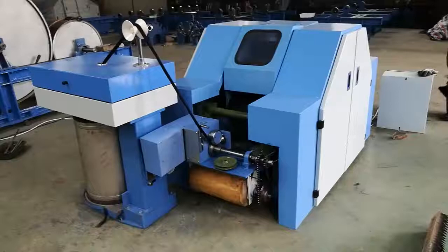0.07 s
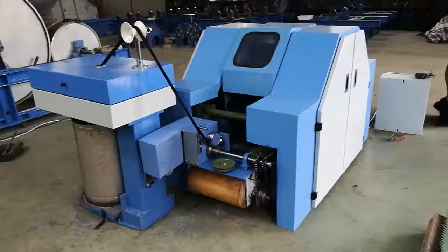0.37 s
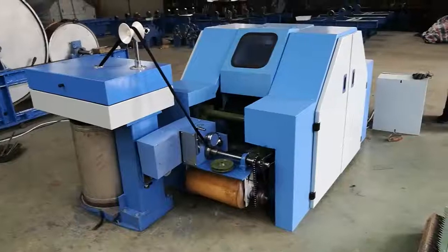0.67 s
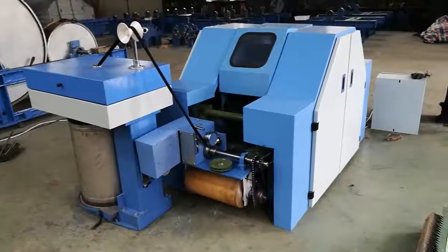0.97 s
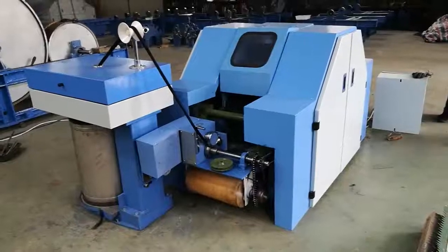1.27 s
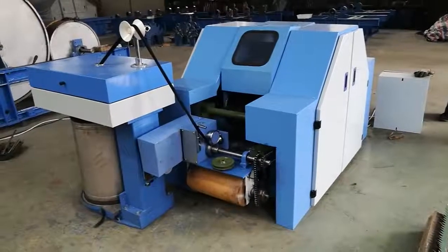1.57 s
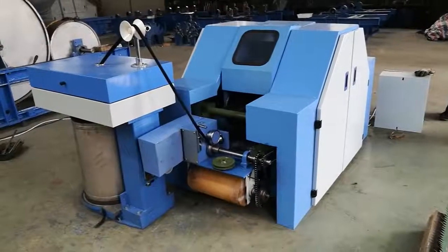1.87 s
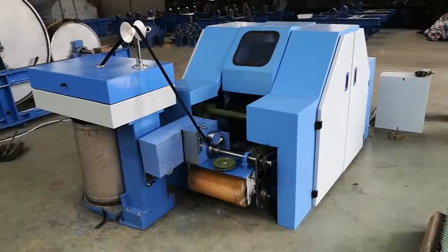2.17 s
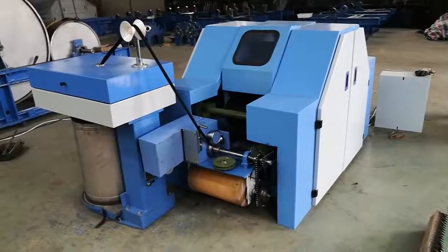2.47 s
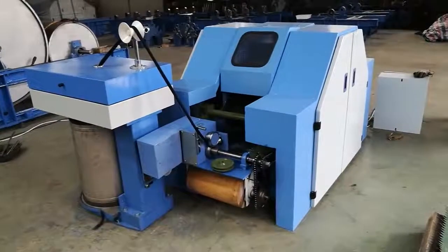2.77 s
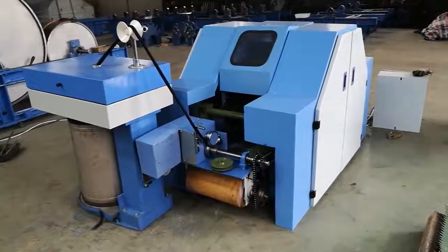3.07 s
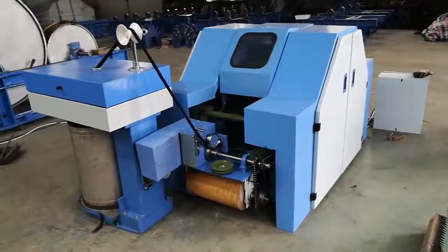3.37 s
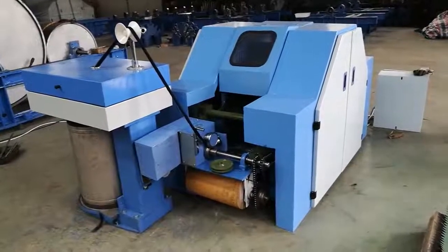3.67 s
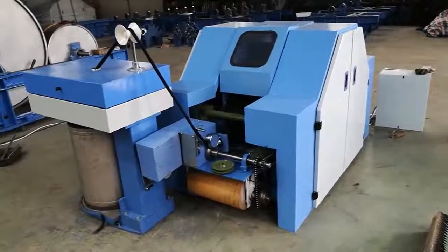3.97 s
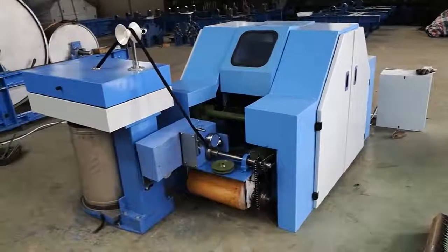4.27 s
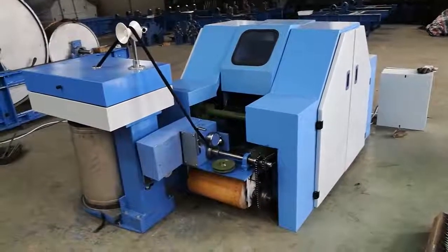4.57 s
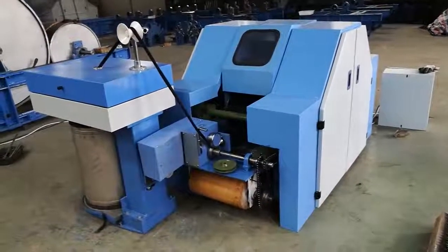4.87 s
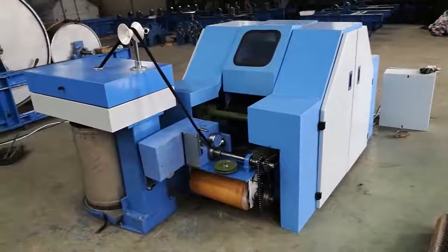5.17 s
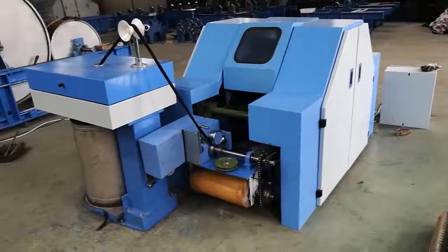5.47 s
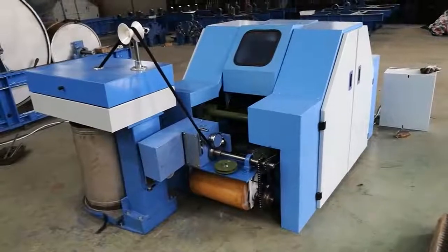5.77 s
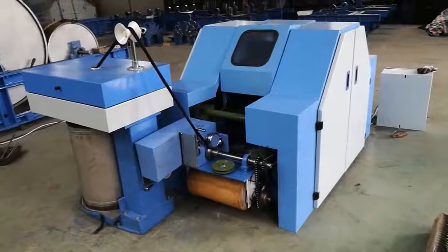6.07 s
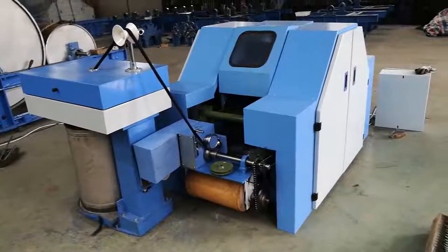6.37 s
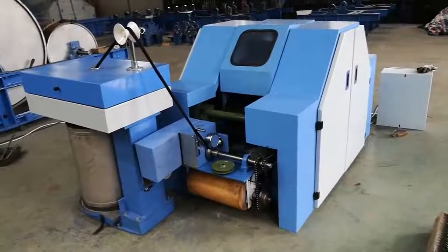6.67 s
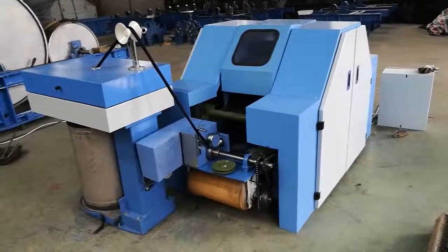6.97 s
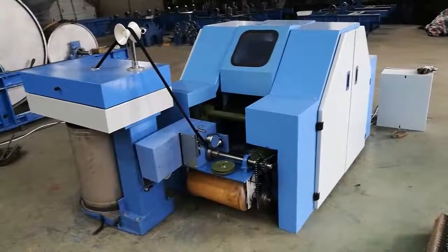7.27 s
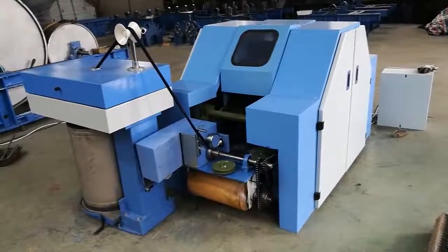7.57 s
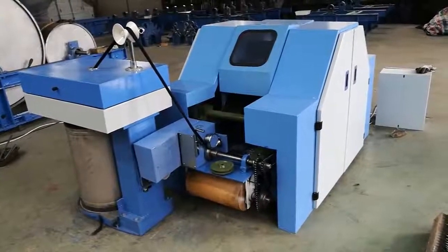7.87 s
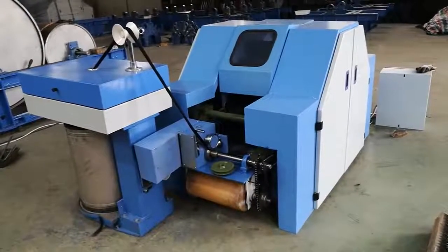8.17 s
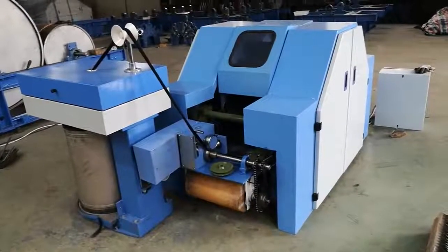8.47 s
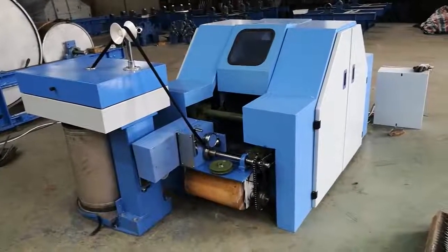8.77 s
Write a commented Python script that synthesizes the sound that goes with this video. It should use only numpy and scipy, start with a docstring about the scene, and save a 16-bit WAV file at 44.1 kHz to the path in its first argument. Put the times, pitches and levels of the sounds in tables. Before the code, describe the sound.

Steady mechanical drone, metallic rattle and hiss from a running carding machine, with scattered light knocks and one panel clunk.

```python
"""A steady drone, clatter and hiss: a wool carding machine in a concrete workshop, a few metres from
a phone's two microphones. A gear drones and its teeth ring the steel, a roller hums, the frame rumbles,
chains clatter, the card wire hisses and the motor drive whistles. Faint high rings swell and fade, a
loose part knocks, and once a side panel clunks. The left microphone faces away and sounds duller."""
import sys
import numpy as np
from scipy import signal
from scipy.fft import rfft, irfft, next_fast_len
from scipy.io import wavfile
from scipy.ndimage import uniform_filter1d

SR = 44100
rng = np.random.default_rng(int(sys.argv[2]) if len(sys.argv) > 2 else 0)


def generate_wav(signal):
    """Clip the signal to [-1, 1] and save it as 16-bit WAV at the path in sys.argv[1]."""
    frames = np.transpose(np.atleast_2d(signal))
    scaled = np.clip(frames, -1, 1) * 32767
    pcm = np.round(scaled).astype(np.int16)
    wavfile.write(sys.argv[1], SR, pcm)


N = 393813
TIME = np.arange(N) / SR
SIZE = next_fast_len(N + SR, True)
FREQ = np.maximum(np.fft.rfftfreq(SIZE, 1 / SR), 1)
MESH_HZ = 164.15  # gear teeth meeting per second


def undb(db):
    """Decibels to gain."""
    return 10 ** (np.asarray(db) / 20)


def unit(x):
    """Scale to rms 1."""
    return x / np.sqrt(np.mean(x ** 2))


def curve(points):
    """Join (t/s, value) points by straight lines."""
    times, values = np.transpose(points)
    return np.interp(TIME, times, values)


def walk(rate):
    """Random levels held 1 / rate s and smoothed twice, rms 1."""
    hold = max(int(SR / rate), 1)
    steps = np.repeat(rng.standard_normal(N // hold + 1), hold)[:N]
    return unit(uniform_filter1d(uniform_filter1d(steps, hold), hold))


def slope(points):
    """Gain at every frequency from (f/Hz, level/dB) points."""
    hz, db = np.transpose(points)
    return undb(np.interp(np.log(FREQ), np.log(hz), db))


def resonances(peaks):
    """Gain at every frequency of steep-sided (f/Hz, half-width/Hz, level/dB) resonances."""
    return np.sqrt(sum(undb(db) ** 2 / (1 + ((FREQ - hz) / width) ** 2) ** 2 for hz, width, db in peaks))


def ring(x, gain):
    """Pass x through the causal (minimum-phase) body that has this gain."""
    cepstrum = irfft(np.log(gain + 1e-6), SIZE)
    cepstrum[1:SIZE // 2] *= 2
    cepstrum[SIZE // 2 + 1:] = 0
    return irfft(rfft(x, SIZE) * np.exp(rfft(cepstrum)), SIZE)[:N]


def band(hz, half_width_hz):
    """Noise in one resonance, rms 1."""
    noise = rfft(rng.standard_normal(SIZE))
    return unit(irfft(noise * resonances([(hz, half_width_hz, 0)]), SIZE)[:N])


def impacts(rate, scatter_db):
    """Random tiny blows of uneven strength, rate a second."""
    blows = (rng.random(N) < rate / SR) * rng.choice([-1, 1], N)
    return unit(blows * undb(scatter_db * rng.standard_normal(N)))


def tone(phase, waver_db, waver_rate):
    """A sine of rms 1 whose strength wavers."""
    return unit(np.sin(phase + 2 * np.pi * rng.random()) * undb(waver_db * walk(waver_rate)))


def strike(start, decay_s, rise_s=0.001):
    """Envelope of a blow: a quick rise and an exponential fall."""
    age = np.maximum(TIME - start, 0)
    return (1 - np.exp(-age / rise_s)) * np.exp(-age / decay_s)


def modes(start, table):
    """Decaying sines (f/Hz, level/dB, decay/s) set off by one blow."""
    live = (TIME > start) & (TIME < start + 1)
    age = TIME[live] - start
    out = np.zeros(N)
    for hz, db, decay in table:
        out[live] += rng.choice([-1, 1]) * undb(db) * np.sin(2 * np.pi * hz * age) * np.exp(-age / decay)
    return out


def gear_drone(turn, drone_db):
    """The gear mesh drones at an uneven level, under two overtones; backlash makes it flutter."""
    # level of the drone's octave: t/s, level/dB
    octave = [(.4, -43), (1.2, -41), (2.2, -46.5), (3.4, -46), (4.3, -40), (5.4, -42), (5.9, -44),
              (6.45, -37.5), (6.8, -47), (7.3, -40), (7.9, -53), (8.9, -54)]
    mesh = MESH_HZ * turn + 0.13 * walk(25)
    first = tone(mesh, waver_db=0.7, waver_rate=12) * undb(drone_db + 1.6)
    second = tone(2 * mesh, waver_db=0.9, waver_rate=6.8) * undb(curve(octave))
    fourth = tone(4 * mesh, waver_db=2.5, waver_rate=7) * undb(-53)
    return first + second + fourth


def roller_hum(turn, roller_hz=11.905):
    """The roller and the other shafts shake the casing, each at its own rates."""
    # roller harmonics: multiple of the turning rate, relative level/dB
    roller = [(5, -68.9), (7, -62.2), (10, -60.5), (13, -56.5), (15, -51.5), (18, -56.5), (25, -53.7),
              (29, -51.2), (31, -50.1), (33, -50.7), (34, -55.8), (35, -46), (36, -50.5), (38, -51.7),
              (40, -53.8), (50, -52.0), (52, -54.5), (57, -55.9)]
    # hum of the other shafts: f/Hz, relative level/dB
    shafts = [(86.5, -61.9), (144.0, -54.1), (198.5, -54.5), (255.7, -55.4), (284.3, -53.9), (287.7, -54.8),
              (337.8, -51.1), (344.5, -49.5), (495.9, -54.7), (587.5, -50.8)]
    lines = [(k * roller_hz, db) for k, db in roller] + list(shafts)
    return undb(1) * sum(undb(db) * tone(hz * turn, waver_db=2.5, waver_rate=5) for hz, db in lines)


def frame_rumble(drone_db, ease_db_per_s=0.2, drone_share=0.078):
    """Drums and belts rumble through the frame, swaying a little with the drone and slowly easing."""
    # spectrum of the frame: f/Hz, relative level/dB
    spectrum = [(20, -32), (45, -26), (65, -19.5), (85, -12.5), (102, -17.5), (125, -13), (152, -5.5),
                (215, -6.5), (340, -1.5), (440, -6), (660, -7), (800, -18.5), (1500, -18), (5000, -63)]
    level_db = -32 - ease_db_per_s * TIME + drone_share * signal.detrend(drone_db)
    return unit(ring(rng.standard_normal(N), slope(spectrum))) * undb(level_db)


def chain_clatter(shake):
    """Links drop onto sprockets and rattle their guards."""
    # spectrum of the chains: f/Hz, relative level/dB
    spectrum = [(300, -19.5), (800, -8), (920, -5), (1650, -4), (1900, -1.5), (2250, 0), (2500, -4.5),
                (3000, -10.5), (3600, -17), (7000, -30.5)]
    # modes of the chain guards: f/Hz, half-width/Hz, relative level/dB
    guards = [(1004, 24, -0.5), (1872, 30, 2), (1985, 48, -1.5), (2616, 44, 0.5), (2750, 40, -20)]
    # brief changes in how hard the chains rattle: t/s, half-length/s, change/dB
    flurries = [(1.047, 0.045, -0.5), (1.68, 0.12, 0.8), (5.303, 0.1, 1.5), (5.547, 0.086, 1),
                (7.46, 0.077, 0.5)]
    links = impacts(rate=6000, scatter_db=1.14) * undb(0.29 * shake)
    flurry_db = sum(db * np.exp(-((TIME - at) / half) ** 2) for at, half, db in flurries)
    body = np.hypot(slope(spectrum), undb(-1.5) * resonances(guards))
    return unit(ring(links, body)) * undb(-28.5 + 0.22 * walk(7) + flurry_db)


def gear_teeth(turn, shake, ease_db_per_s=0.01, surge_half_s=0.022):
    """Every tooth scrapes in and out of mesh and rings the steel, whose upper modes swell and ebb."""
    # lower and upper modes of the steel gears: f/Hz, half-width/Hz, relative level/dB
    lower_modes = [(4437, 41, -16), (4635, 230, -12.8), (4852, 38, -5.5), (4934, 18, -.7), (4986, 42, -3.6),
                   (5074, 34, -3.2), (5142, 58, -4.2), (5262, 36, -7.2)]
    upper_modes = [(5425, 55, -5.5), (5498, 42, -1), (5543, 18, 2), (5670, 150, -11.5)]
    # the upper modes against the lower: t/s, level/dB
    upper_level = [(.4, -4), (2.2, -5), (2.8, -7.5), (3.7, -6.5), (4.2, -5.5), (5.0, -2.5), (7.2, -3),
                   (7.9, -2.5), (8.9, -3)]
    # the teeth bite harder for a moment: t/s, rise/dB
    surges = [(4.17, 5.5), (8.24, 3.5), (8.46, 3.5)]
    mesh = MESH_HZ * turn
    contact = 1 + 0.12 * np.cos(mesh) + 0.2 * np.cos(2 * mesh)
    scrape = impacts(rate=7000, scatter_db=3.0) * contact * undb(0.28 * shake)
    lower = unit(ring(scrape, resonances(lower_modes)))
    upper = unit(ring(scrape, resonances(upper_modes))) * undb(curve(upper_level))
    surge_db = sum(db * np.exp(-((TIME - at) / surge_half_s) ** 2) for at, db in surges)
    bite_db = -29.5 - ease_db_per_s * TIME + 0.24 * walk(10) + surge_db
    return (lower + upper) * undb(bite_db)


def cover_echoes(x, share=0.4, sway_s=0.00006, count=24):
    """Sound bounces between the steel covers: a metallic ripple that shifts as the hand sways."""
    lags_s = rng.uniform(0.002, 0.014, count)
    signs, leans = rng.choice([-1, 1], count), rng.standard_normal(count)
    sway = sway_s * walk(0.73)
    echoes = sum(sign * np.interp(TIME - lag - lean * sway, TIME, x)
                 for sign, lag, lean in zip(signs, lags_s, leans))
    return x + share * echoes / np.sqrt(count)


def card_wire(turn, shake):
    """The card wire combs the fleece: a dense hiss that pulses with the gear."""
    # spectrum of the wire: f/Hz, relative level/dB
    spectrum = [(1500, -17), (3600, 2.5), (4400, 11), (5700, 9), (6050, 6), (6600, -2), (7200, 1.5),
                (8300, 3.5), (8900, 0.5), (9500, 5), (11100, 4.5), (11700, -8), (13300, -8.5), (15500, -17)]
    mesh = MESH_HZ * turn
    pull = 1 + 0.055 * np.cos(mesh) + 0.13 * np.cos(2 * mesh)
    combing = impacts(rate=12000, scatter_db=1.5) * pull
    hiss = cover_echoes(ring(combing, slope(spectrum)))
    return unit(hiss) * undb(-33.0 + 0.93 * shake + 0.36 * walk(5.1))


def drive_whistle(flutter_rad=0.34):
    """The motor drive's switching gives thin tones that flutter in pitch and strength."""
    # switching tones: f/Hz, level/dB
    lines = [(5863.5, -51.9), (6045, -60.2), (6137.7, -43.8), (6633.5, -62.0)]
    out = 0
    for hz, db in lines:
        phase = 2 * np.pi * hz * TIME + flutter_rad * walk(42)
        out += undb(db) * tone(phase, waver_db=1.7, waver_rate=36)
    return out


def high_rings():
    """Faint high rings, each a narrow band of noise, swell and fade over two that last."""
    # lasting rings: f/Hz, half-width/Hz, level/dB
    lasting = [(8010, 45, -54), (10820, 75, -51)]
    # swelling rings: middle t/s, length/s, f/Hz, half-width/Hz, relative level/dB
    swelling = [(1.6, 1.9, 10790, 70, -47), (.8, .8, 5505, 16, -40), (1.37, .25, 5545, 10, -38),
                (2.05, 1.1, 5540, 12, -39), (2.9, 3.8, 2635, 18, -51), (2.9, 1.5, 10560, 70, -51),
                (3.05, .8, 7965, 25, -51), (3.5, .7, 5078, 10, -39), (1.1, .4, 4983, 8, -41),
                (3.6, 1.2, 10950, 70, -49), (3.85, 1.3, 8270, 40, -51), (4.3, 1.8, 4936, 11, -38.5),
                (4.3, .5, 5505, 18, -39), (5.45, .8, 5541, 14, -37), (5.2, 1.2, 9600, 250, -49),
                (5.95, 1.4, 10810, 55, -48.5), (6.13, .25, 5537, 10, -38), (6.44, .22, 5505, 18, -37),
                (7.25, .2, 5542, 12, -39), (7.25, 1.9, 9870, 28, -46), (7.2, 1.4, 11290, 40, -53),
                (8.47, .1, 5540, 14, -37), (8.74, .2, 5544, 12, -36), (8.5, 1.4, 10860, 70, -51)]
    out = sum(undb(db) * band(hz, width) for hz, width, db in lasting)
    for middle, length, hz, width, db in swelling:
        swell = np.sqrt(np.maximum(1 - (2 * (TIME - middle) / length) ** 2, 0))
        out += undb(db + 2) * band(hz, width) * swell
    return out


def loose_part(focus_hz=90, spread_db=2):
    """A loose part knocks: the spot it hits picks the modes that clank; it buzzes on its neighbour."""
    # knocks: t/s, relative level/dB, buzz decay/s, pitch f/Hz
    knocks = [(.465, -24.5, 0.055, 2030), (.8, -28, .015, 1873), (.998, -26.5, .02, 1916),
              (1.282, -26, .014, 1862), (1.58, -25, .055, 1959), (1.755, -26, .045, 2150),
              (2.123, -26, .015, 1873), (3.322, -26, .015, 2150), (4.343, -27, .015, 1927),
              (4.85, -27, .015, 1916), (5.148, -26, .03, 2050), (5.216, -23, 0.1, 1950),
              (5.285, -25.5, .07, 2340), (5.331, -23, .036, 1900), (5.398, -25, .03, 2100),
              (5.498, -25, .035, 2250), (6.628, -21, 0.02, 1852), (7.46, -25.5, .055, 2250),
              (7.515, -25, .035, 1950), (7.735, -27, .015, 1873), (7.887, -27, .015, 1981),
              (8.217, -23, 0.02, 2200), (8.76, -26, 0.02, 2045)]
    # modes of the part: f/Hz, relative level/dB, decay/s
    part_modes = [(1852, 0, .026), (1905, -2, .026), (1972, -2, .026), (2145, -3, .025), (2250, -4, .02),
                  (2340, -7, .02)]
    mode_hz, mode_db, mode_decay_s = np.transpose(part_modes)
    out = 0
    for start, blow_db, buzz_decay_s, pitch_hz in knocks:
        scatter_db = spread_db * rng.standard_normal(len(part_modes))
        off_pitch_db = 10 * np.log10(1 + ((mode_hz - pitch_hz) / focus_hz) ** 2)
        clank = modes(start, zip(mode_hz, mode_db + scatter_db - off_pitch_db, mode_decay_s))
        buzz = band(pitch_hz, half_width_hz=440) * strike(start, buzz_decay_s)
        out += undb(blow_db) * (undb(-4.5) * clank + undb(-3.5) * buzz)
    return out


def panel_clunk(blow_s=5.319, fall_back_s=5.398):
    """A blow sets the side panel ringing and shuddering; it falls back with a low thump."""
    # modes of the panel: f/Hz, relative level/dB, decay/s
    panel_modes = [(371, -2, 0.04), (482, 4, 0.031), (560, -1, 0.025), (717, 3, 0.045), (797, 0, 0.024),
                   (1035, -3, .025), (1136, 4.5, 0.023), (1450, 3, .02), (1690, -6, 0.03)]
    # the panel radiates little bass: f/Hz, gain/dB
    radiation = [(50, -19), (220, 0)]
    shudder = undb(-28.5) * band(hz=556, half_width_hz=280) * strike(blow_s, decay_s=0.11)
    thump = undb(-26) * band(hz=255, half_width_hz=85) * strike(fall_back_s, decay_s=0.04)
    ringing = undb(-30) * modes(blow_s, panel_modes)
    return ring(ringing + shudder + thump, slope(radiation))


def workshop_echo(x, t60_s=0.76, gap_s=0.0088):
    """Diffuse echo off the concrete, with a fresh tail for each microphone."""
    t = TIME[:SR]
    tail = rng.standard_normal(SR) * np.exp(-np.log(1000) * t / t60_s) * (t > gap_s)
    return signal.fftconvolve(x, tail / np.sqrt(np.sum(tail ** 2)))[:N]


def left_microphone(machine, echo, lag_s=0.00054):
    """Facing away, it hears the machine later and much duller, plus some scattered echo."""
    # shading against the right microphone: f/Hz, gain/dB
    shading = [(60, -3), (110, 2), (200, 0.5), (380, -3), (700, -8.5), (1290, -13), (2380, -17.5),
               (4400, -23.5), (8120, -29.5), (15000, -26)]
    # scattered echo that arrives unshaded: f/Hz, gain/dB
    scatter = [(500, -39), (2000, -27), (5000, -34), (8000, -29), (12000, -32)]
    arriving = machine + undb(-20) * echo
    late = irfft(rfft(arriving, SIZE) * np.exp(-2j * np.pi * FREQ * lag_s), SIZE)[:N]
    return ring(late, slope(shading)) + ring(echo, slope(scatter))


def scene():
    """The machine from a few metres, in stereo; its parts share one drive whose speed wanders a little."""
    # level of the low drone, wavering unevenly: t/s, relative level/dB
    drone_level = [(0.4, -58), (0.55, -49), (0.7, -39.5), (0.85, -44), (1.1, -38), (1.28, -44), (1.95, -39),
                   (2.35, -41.5), (2.62, -47), (2.8, -40.5), (3.4, -40), (4.1, -44.5), (4.62, -42),
                   (4.85, -51), (5.15, -41.5), (6.3, -44), (6.44, -51), (6.58, -44), (6.8, -47.5),
                   (7.4, -46), (7.78, -39.5), (8.0, -45.5), (8.35, -47), (8.55, -41.5), (8.9, -47)]
    drone_db = curve(drone_level)
    turn = 2 * np.pi * np.cumsum(1 + 0.00074 * walk(2.5)) / SR  # drive phase, radians per Hz
    shake = walk(22)  # uneven fleece jolts chains, teeth and wire together
    rattle = chain_clatter(shake) + gear_teeth(turn, shake) + card_wire(turn, shake)
    rattle += loose_part() + panel_clunk()
    lows = gear_drone(turn, drone_db) + roller_hum(turn) + frame_rumble(drone_db)
    machine = lows + drive_whistle() + high_rings() + rattle
    right = machine + undb(-11) * workshop_echo(rattle)
    left = left_microphone(machine, workshop_echo(rattle))
    microphone_hiss = undb(-71) * rng.standard_normal((2, N))
    return np.array([left, right]) + microphone_hiss


def record(dry, top_hz=15350):
    """The sound fades in, and the highest treble is cut."""
    # fade-in: t/s, gain
    fade_in = ((.113, 0), (.116, .06), (.41, 1))
    lowpass = signal.ellip(12, 0.2, 80, top_hz, fs=SR, output="sos")
    return signal.sosfilt(lowpass, dry * curve(fade_in))


dry = scene()
out = record(dry)
generate_wav(out)
```